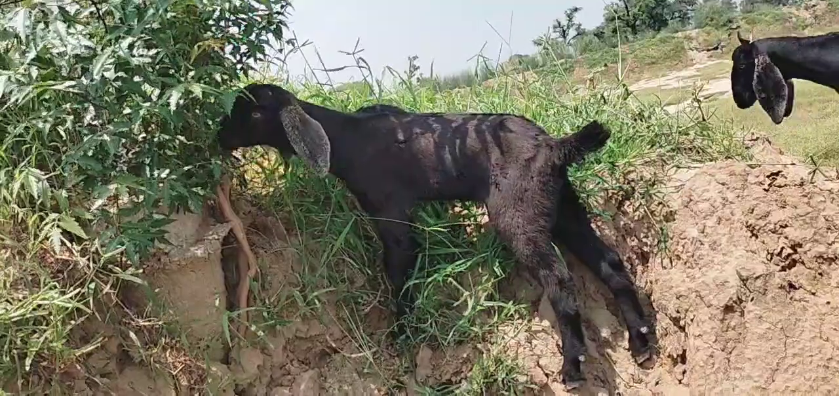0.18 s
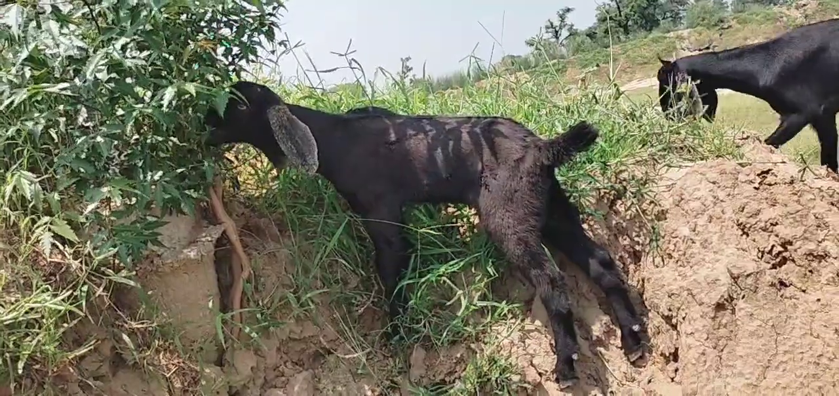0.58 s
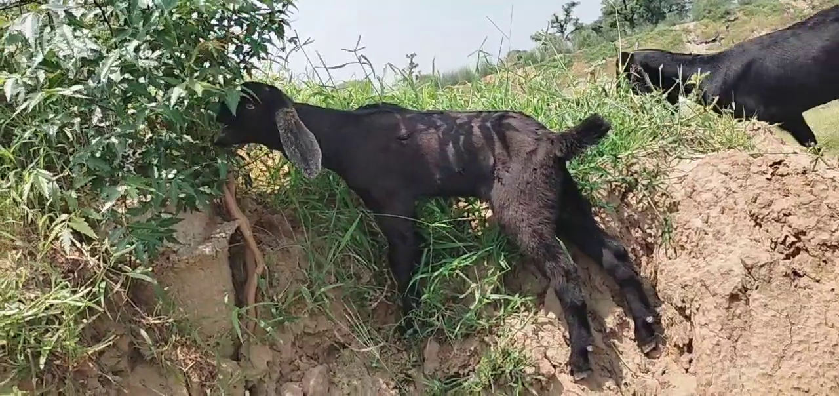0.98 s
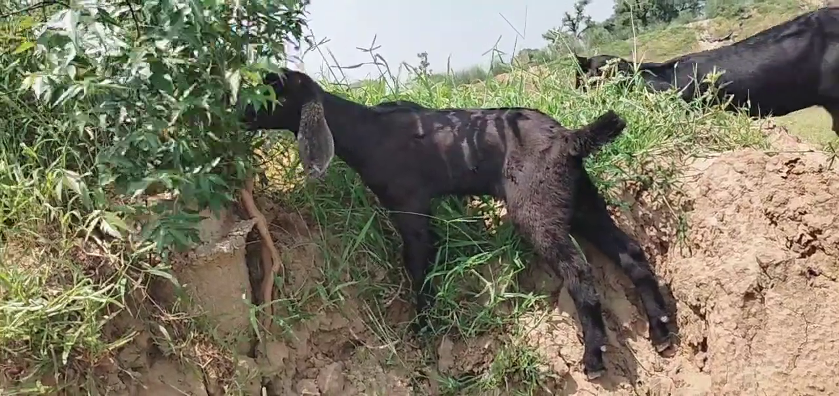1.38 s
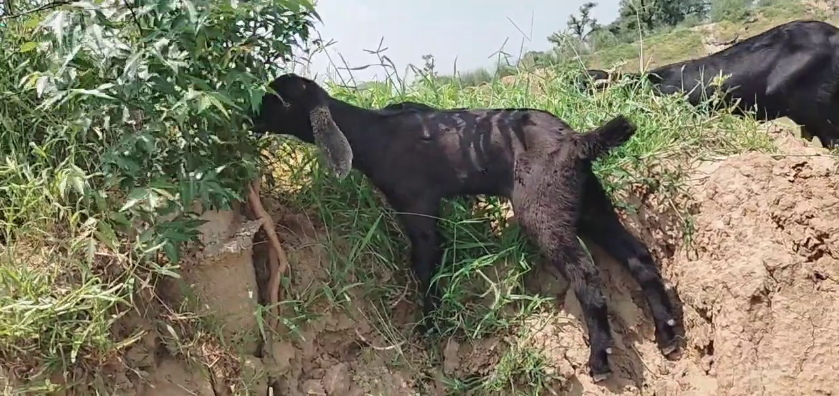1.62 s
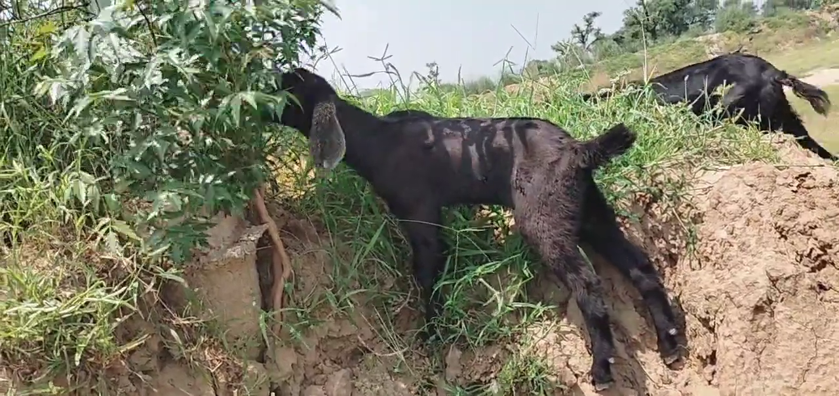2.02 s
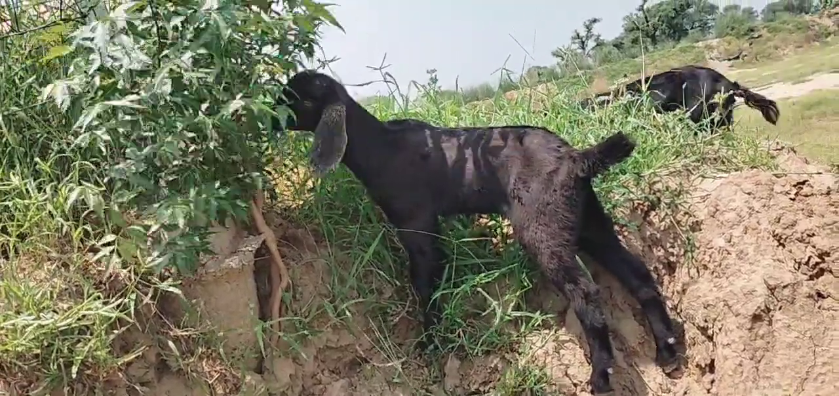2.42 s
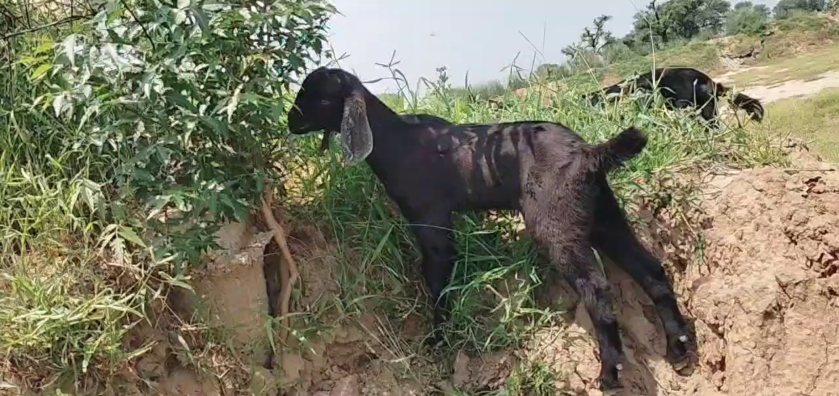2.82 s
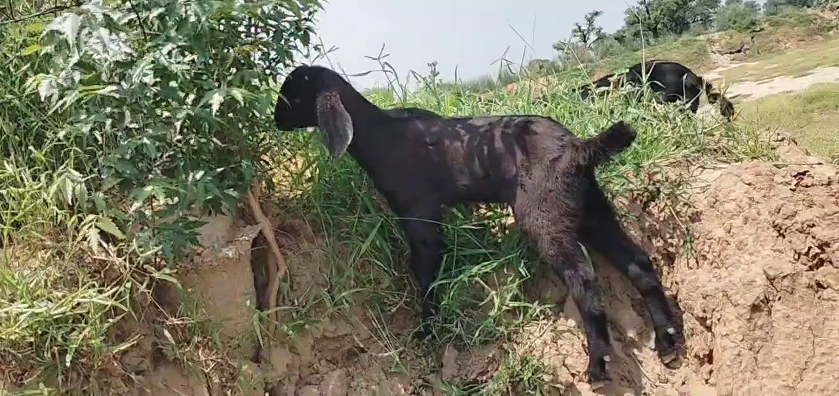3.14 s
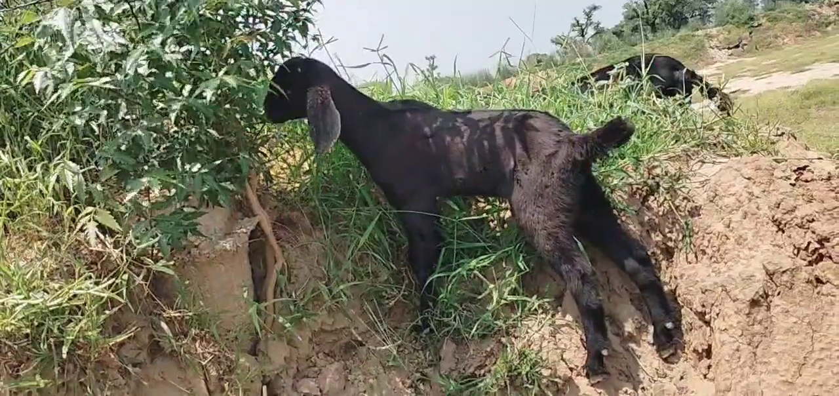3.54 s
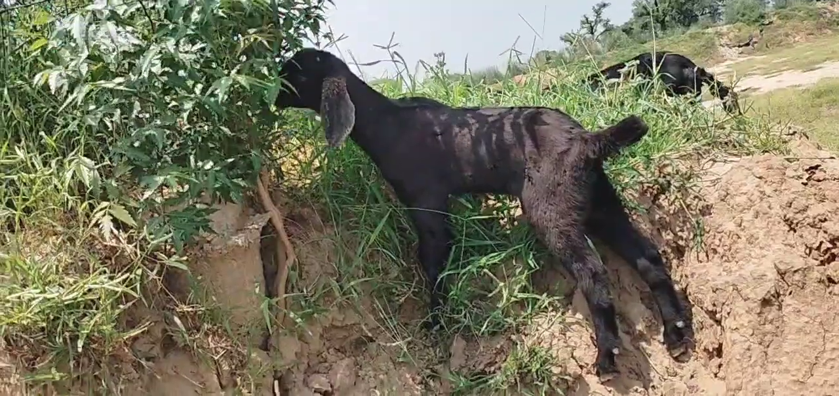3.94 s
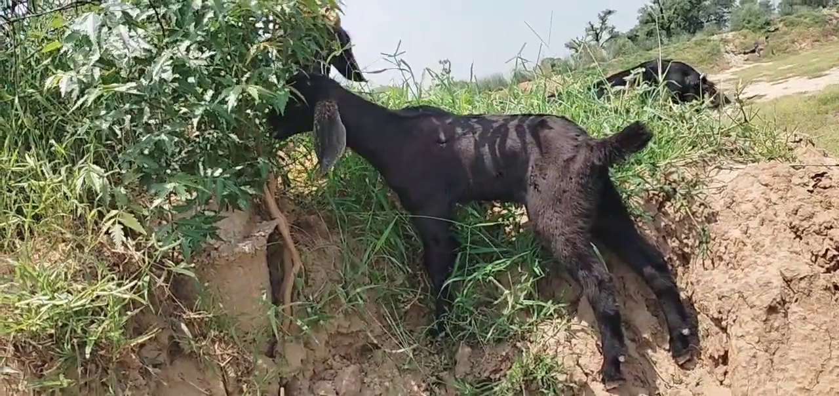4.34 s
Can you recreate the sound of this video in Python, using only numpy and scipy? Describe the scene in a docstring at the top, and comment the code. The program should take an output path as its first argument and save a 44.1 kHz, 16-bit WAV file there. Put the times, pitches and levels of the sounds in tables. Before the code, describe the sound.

Small birds chatter, peep and tick in an open, dry field with a quiet airy hush. Near the microphone, leaves brush and crackle as a goat feeds. One hard nasal snort bursts out early, far louder than the rest. Later come repeated falling whistles, stronger branch rustles, dull snaps, faint low puffs, and one weak snort around three seconds.

```python
"""Small birds chatter and tick while leaves rustle near by: a goat pushes its head through a leafy bush
on an open field bank, with twig snaps, soft low puffs, one hard snort and later a softer one.
Birds are gliding sines, the bush is clumped noise grains, twigs and puffs are short ringing bursts,
and the snorts are nostril flaps that knock a cavity and chop a hiss, over a quiet outdoor hush."""
import sys
import numpy as np
from scipy import signal
from scipy.fft import rfft, irfft
from scipy.io import wavfile

SR = 44100
rng = np.random.default_rng(int(sys.argv[2]) if len(sys.argv) > 2 else 0)


def ratio_of_db(decibels):
    """Turn decibels (scalar or array-like) into linear amplitude factors; 0 dB maps to 1."""
    return 10 ** (np.asarray(decibels, float) / 20)


def wav_out(sig):
    """Save sig, one row per channel (or a flat mono array), as 16-bit PCM at SR to the path in sys.argv[1]."""
    wavfile.write(sys.argv[1], SR, np.round(np.clip(np.atleast_2d(sig).T, -1, 1) * 32767).astype(np.int16))


N = 197656   # length in samples


def seconds(length_s):
    """Time in seconds at every sample of a short sound."""
    return np.arange(round(length_s * SR)) / SR


def rms_one(x):
    """Scale to rms 1."""
    return x / np.sqrt(np.mean(x ** 2) + 1e-20)


def coloured(x, spectrum):
    """Give a flat sound the spectrum (Hz, dB per Hz), then scale to rms 1."""
    hz, db = np.transpose(spectrum)
    bins = np.arange(N // 2 + 1) * SR / N + 1
    gain = ratio_of_db(np.interp(np.log(bins), np.log(hz), db))
    return rms_one(irfft(rfft(x) * gain, N))


def band(x, low_hz, high_hz):
    """Butterworth band-pass."""
    return signal.sosfilt(signal.butter(2, [low_hz, high_hz], "band", fs=SR, output="sos"), x)


def resonate(x, hz, width_hz):
    """Two-pole resonance with gain 1 on top."""
    r = np.exp(-np.pi * width_hz / SR)
    feedback = [1, -2 * r * np.cos(2 * np.pi * hz / SR), r * r]
    return signal.lfilter([(1 - r * r) / 2, 0, (r * r - 1) / 2], feedback, x)


def drift(rate):
    """Slow random wander of rms 1; a higher rate (Hz) wanders faster."""
    r = np.exp(-2 * np.pi * rate / SR)
    smooth = signal.lfilter([1], [1, -2 * r, r * r], rng.standard_normal(N + SR))
    return rms_one(smooth[SR:])


def grains(per_s, spread_db, clump_db):
    """Random leaf contacts of uneven size that come in clumps; rms 1."""
    sizes = ratio_of_db(spread_db * np.minimum(rng.exponential(1, N), 4)) * rng.standard_normal(N)
    contacts = rng.random(N) < per_s / SR
    return rms_one(sizes * contacts * ratio_of_db(clump_db * drift(40.0)))


def add(out, start_s, sound):
    """Mix a short sound in at its start time."""
    i = round(start_s * SR)
    out[i:i + len(sound)] += sound[:N - i]


# Colour of the hush. Each row: pitch in Hz, relative level in dB per Hz.
HUSH_SPECTRUM = [(18, -44), (30, -8), (111, 6.5), (353, -3.5), (459, -2), (645, -2), (2100, -7.5),
                 (2800, -7.5), (4260, -6), (5990, -19), (8200, -34), (11200, -25), (15800, -19)]


def hush():
    """Quiet outdoor noise whose level wanders slowly."""
    level_db = -72.5 + 2.07 * drift(7.5)
    return ratio_of_db(level_db) * coloured(rng.standard_normal(N), HUSH_SPECTRUM)


NOTE_EDGE_S, CHATTER_WAVER_DB, FADE_DB_PER_S = .005, 3.5, 40.5


def whistle(rows, edge_s, waver_db, multiple=1):
    """A sine along rows (s, Hz, rms dB) with soft ends; strength and pitch waver at random."""
    s, hz, db = np.transpose(rows)
    t = np.arange(s[0], s[-1], 1 / SR)
    ends = np.clip(np.minimum(t - s[0], s[-1] - t) / edge_s, 0, 1)
    waver, wobble = [np.interp(t - s[0], np.arange(80) * .004, rng.standard_normal(80)) for _ in range(2)]
    pitch = np.interp(t, s, hz) * (1 + .005 * waver_db * wobble)
    turns = multiple * np.cumsum(pitch) / SR
    level = ratio_of_db(np.interp(t, s, db) + waver_db * waver)
    return np.sqrt(2) * ends * level * np.sin(2 * np.pi * turns)


# Shapes of a falling whistle and a rising peep.
# Each row: seconds from the start, pitch in Hz, level in dB added to that of the call.
FALL_SHAPE = [(0, 5657, -4), (.008, 4700, -2.5), (.02, 3900, 7), (.035, 3450, 4), (.06, 3150, 8),
              (.08, 2850, 4), (.092, 2640, 11)]
PEEP_SHAPE = [(0, 5910, -8), (.015, 6200, -3), (.03, 6500, 0), (.042, 6580, -6)]
# When they call. Each row: start in seconds, level in dB added to that of the shape.
FALL_CALLS = [(1.431, -84), (1.779, -79.5), (2.123, -79.5), (2.466, -78), (2.814, -71), (3.16, -69),
              (3.516, -73), (3.873, -73.5)]
PEEP_CALLS = [(.188, -80), (.468, -70.5), (1.772, -74), (2.05, -73.5), (2.325, -75), (2.6, -76),
              (2.868, -74), (3.42, -92)]


def repeated_calls():
    """Two birds each repeat one fixed glide of pitch."""
    out = np.zeros(N)
    for shape, calls in [(FALL_SHAPE, FALL_CALLS), (PEEP_SHAPE, PEEP_CALLS)]:
        for start, db in calls:
            add(out, start, ratio_of_db(db) * whistle(shape, NOTE_EDGE_S, waver_db=3.0))
    return out


# Shape of one tick. Each row: seconds from the start, share of the tick's top pitch,
# level in dB added to the call.
TICK_SHAPE = [(0, 0.76, 0.5), (.0009, 1, -3), (.0018, .84, -36), (.003, .6, -34)]
# The chip after two ticks. Each row: seconds from the first tick, pitch in Hz, level in dB added to the call.
CHIP_SHAPE = [(.022, 3100, -28), (.025, 3700, -18), (.028, 3300, -20), (.031, 4700, -14),
              (.0345, 4900, -15), (.036, 4900, -28)]
# Each row: start in seconds, level in dB added to the shapes, top pitch of the ticks in Hz.
TICK_CALLS = [(0.081, -54.5, 8100), (0.984, -52, 8400), (1.8343, -46.5, 8300), (2.7377, -42.5, 8400),
              (3.6315, -40, 8770), (4.4373, -41, 8750)]


def ticks():
    """A bird gives two very short ticks, the first one softer, and then a chip."""
    out = np.zeros(N)
    for start, db, top_hz in TICK_CALLS:
        tick = ratio_of_db(db) * whistle(np.multiply(TICK_SHAPE, [1, top_hz, 1]), edge_s=.0004, waver_db=3)
        add(out, start, tick * ratio_of_db(-2.5))
        add(out, start + .0122, tick)
        chip = ratio_of_db(db) * whistle(CHIP_SHAPE, edge_s=.001, waver_db=1)
        add(out, start + CHIP_SHAPE[0][0], chip)
    return out


# Gliding notes, and two faint glides at about three times the pitch of the rich calls, at 4.002 and 4.37 s.
# Each row: start in seconds, length in seconds, start pitch in Hz, end pitch in Hz, level in dB at the start.
GLIDES = [(.055, 0.082, 4790, 3860, -67.5), (.095, 0.086, 2050, 2150, -69.5),
          (.108, 0.026, 4850, 4400, -66), (.14, 0.025, 4350, 3940, -67), (.165, .02, 5300, 5030, -78),
          (.358, 0.076, 5000, 3800, -71), (.305, 0.016, 4700, 4780, -75.5), (.45, 0.014, 5300, 4860, -61),
          (.746, 0.034, 4540, 3600, -73), (.835, 0.031, 4000, 3350, -70), (.905, 0.03, 3400, 3470, -71.5),
          (.93, 0.0095, 3830, 5300, -72), (1.012, 0.044, 4470, 4880, -70.5),
          (1.025, 0.063, 3870, 3470, -70.5), (1.078, 0.03, 3270, 3800, -63.5),
          (1.69, 0.023, 4160, 4060, -79), (1.722, 0.029, 4130, 4500, -75), (1.752, .02, 5400, 4950, -83),
          (2.16, 0.023, 3820, 4340, -73), (3.265, 0.029, 3500, 3385, -66), (3.43, 0.04, 2150, 2310, -71.5),
          (3.454, 0.023, 2730, 2820, -67), (3.62, 0.052, 2780, 2220, -68),
          (3.675, 0.033, 3100, 3820, -67.5), (3.75, 0.099, 2050, 2170, -70.5),
          (3.995, 0.02, 1840, 1800, -61), (4.002, 0.033, 7800, 8250, -78), (4.118, 0.041, 1790, 1810, -65),
          (4.148, 0.052, 5380, 3840, -72), (4.236, 0.04, 5000, 4750, -73), (4.37, 0.11, 5560, 4950, -75)]
# Notes that go up and down again. Each row: start in seconds, length in seconds, edge pitch in Hz,
# top pitch in Hz, level in dB at the start.
ARCHED_NOTES = [(.408, 0.043, 3820, 5500, -65), (.418, 0.04, 3780, 4330, -63),
                (.488, 0.041, 3630, 4770, -64.5), (1.535, 0.051, 5480, 5860, -77),
                (1.652, 0.03, 3960, 5500, -81), (4.192, 0.029, 4100, 4230, -66.5)]


def chatter():
    """Short fading notes and two rich-call overtones: glides level out, arches return to their edge pitch."""
    out = np.zeros(N)
    along = np.linspace(0, 1, 12)
    glide = 1 - (1 - along) ** 3.7   # starts steep
    arch = np.abs(np.sin(np.pi * along)) ** 0.74   # a smaller power flattens the top
    for notes, shape in [(GLIDES, glide), (ARCHED_NOTES, arch)]:
        for start, length, from_hz, to_hz, db in notes:
            hz = from_hz + (to_hz - from_hz) * shape
            rows = np.transpose([length * along, hz, db - FADE_DB_PER_S * length * along])
            add(out, start, whistle(rows, NOTE_EDGE_S, CHATTER_WAVER_DB))
    return out


# Each row: level in dB at the start, level in dB of the overtone against it before the throat filter,
# then the path of the pitch as pairs of time in seconds and pitch in Hz.
RICH_NOTES = [(-59.5, 2.5, [(3.995, 2490), (4.01, 2710), (4.043, 2930), (4.058, 2680)]),
              (-68, -9, [(4.06, 2924), (4.15, 2840)]), (-57.5, -4, [(4.218, 5300), (4.23, 4100),
              (4.25, 3400), (4.275, 2942), (4.305, 2428), (4.345, 2206), (4.385, 1900), (4.44, 1519)])]


def rich_calls():
    """A bird whistles with a strong overtone at twice the pitch, filtered by its throat."""
    out = np.zeros(N)
    for db, overtone_db, path in RICH_NOTES:
        start = path[0][0]
        rows = [(s, hz, db - FADE_DB_PER_S * (s - start)) for s, hz in path]
        overtone = whistle(rows, 0.0079, 2.4, multiple=2)
        overtone = band(band(overtone, 2300, 5000), 2000, 4800)   # the throat favours the middle
        add(out, start, whistle(rows, 0.01, 2.6) + ratio_of_db(overtone_db) * overtone)
    return out


# Each row: start in seconds, end in seconds, start pitch in Hz, later pitch in Hz,
# start level in dB before the weights of the overtones.
BUZZY_NOTES = [(0.783, 0.908, 1366, 1424, -61.5), (3.156, 3.292, 1400, 1432, -58.5)]
# Each row: multiple of the pitch, weight in dB.
BUZZY_OVERTONES = [(1, -7), (2, -0.5), (4, -18), (5, -18)]


def buzzes():
    """A bird's note with overtones flutters quickly in strength, which sounds as a buzz."""
    out = np.zeros(N)
    per_s, depth = 103, 0.44
    for start, end, start_hz, end_hz, db in BUZZY_NOTES:
        rows = [(start, start_hz, db), (start + 0.0344, end_hz, db - 3.0), (end, end_hz, db - 9.0)]
        note = sum(ratio_of_db(part_db) * whistle(rows, 0.015, waver_db=6.0, multiple=k)
                   for k, part_db in BUZZY_OVERTONES)
        flutter = 1 + depth * np.sin(2 * np.pi * per_s * np.arange(len(note)) / SR)
        add(out, start, note * flutter)
    return out


def birds():
    """All the bird voices together."""
    return repeated_calls() + ticks() + chatter() + rich_calls() + buzzes()


# Tugs at the branch. Each row: peak time in seconds, rise in seconds, fall in seconds,
# peak rustle in dB, peak crackle in dB. Rise and fall span 28 dB; the crackle shortens the fall.
BRANCH_TUGS = [(0.0, .01, 0.15, -70.5, -80), (0.095, 0.092, 0.29, -65.5, -72.5),
               (0.3, .004, 0.021, -61, -77), (0.405, 0.0065, 0.1, -56.5, -59),
               (0.54, 0.6, 0.16, -70.5, -79), (0.838, 0.23, 0.4, -66, -77), (1.023, .12, 0.16, -67, -75),
               (1.282, 0.75, 0.27, -67, -74.5), (1.442, 0.09, 0.2, -68, -80), (1.542, 0.083, .11, -58, -71),
               (1.881, 0.17, .13, -62.5, -75.5), (2.01, 0.086, 0.44, -61.5, -68),
               (2.11, 0.58, 0.04, -64.5, -87), (2.213, 0.088, 0.4, -60.5, -76),
               (2.399, 0.012, 0.13, -52, -76), (2.509, 0.02, 0.082, -62.5, -85),
               (2.574, 0.029, 0.016, -49, -90), (2.6, 0.053, 0.35, -58.5, -96), (2.73, 0.18, 1, -58, -65.5),
               (2.9, 0.71, 0.6, -75, -72), (3.051, 0.023, 0.39, -49, -64.5), (3.15, 0.3, 0.32, -55, -75),
               (3.42, 0.12, 0.44, -80, -89), (3.559, 0.16, 0.13, -65.5, -78),
               (3.647, 0.045, 0.31, -59.5, -71), (3.81, 0.59, 0.11, -65, -92),
               (3.995, 0.17, 0.26, -61, -84), (4.131, 0.077, 0.08, -56, -75), (4.26, 0.085, 0.04, -67, -79),
               (4.32, 0.22, 0.95, -62.5, -74)]


def tugging():
    """Every tug swells and dies away, overlaps add in power; gives the gains of rustle and crackle."""
    span_db, crackle_fall_share, still_crackle_db = 28, 0.54, -94.5
    t = np.arange(0, N + 32, 32) / SR
    peak, rise, fall, rustle_db, crackle_db = np.transpose(BRANCH_TUGS)[:, :, None]
    before = np.maximum(peak - t, 0) / rise
    after = np.maximum(t - peak, 0) / fall
    rustle = ratio_of_db(rustle_db - span_db * (before + after)) ** 2
    # the crackle dies sooner than the rustle
    crackle = ratio_of_db(crackle_db - span_db * (before + after / crackle_fall_share)) ** 2
    powers = rustle.sum(axis=0), crackle.sum(axis=0) + ratio_of_db(still_crackle_db) ** 2
    return [np.interp(np.arange(N) / SR, t, np.sqrt(power)) for power in powers]


# Colour of the rubbing. Each row: pitch in Hz, relative level in dB per Hz.
BRANCH_SPECTRUM = [(180, -10), (300, -6), (778, -4.5), (1330, -3), (1680, 0.5), (1990, -0.5), (6500, -23.5),
                   (8450, -123), (14300, -120)]
# Woody resonances. Each row: pitch in Hz, width in Hz, strength in dB relative to the other rows.
WOOD_MODES = [(1330, 147, 3.5), (1790, 110, -26), (2150, 177, -5.5), (888, 49, -0.5), (490, 70, -9)]


def woody_rub():
    """Dragging branches: many small contacts excite wood resonances whose strengths wander; rms 1."""
    rub = coloured(grains(5500, spread_db=-1.0, clump_db=2.37), BRANCH_SPECTRUM)
    ring = sum(ratio_of_db(db + 1.6 * drift(5.7)) * resonate(rub, hz, width) for hz, width, db in WOOD_MODES)
    return rms_one(rub + 0.53 * ring)


# Relative strength in dB of five bands of the crackle, from low to high.
CRACKLE_BANDS = [8.5, -26, 6, -5, 3.5]


def leaf_crackle():
    """Dry leaf contacts in bands that wander separately, so the crackle is patchy in pitch; rms 1."""
    dry_leaves = grains(6000, spread_db=2.0, clump_db=-1.5)
    edges = np.geomspace(4200, 17000, 6)
    crackle = np.zeros(N)
    for k, db in enumerate(CRACKLE_BANDS):
        part = band(dry_leaves, edges[k], edges[k + 1])
        crackle += (-1) ** k * ratio_of_db(db + 2.9 * drift(17)) * part
    return rms_one(crackle)


# Swells of a soft high hiss. Each row: time in seconds, level in dB before a cut of 6 dB.
HISS_SWELLS = [(0.0, -84), (0.11, -75.5), (0.364, -84), (0.424, -72), (0.738, -90), (0.833, -73.5),
               (1.008, -71.5), (1.746, -82.5), (2.02, -76.5), (2.519, -77), (2.754, -69.5), (3.008, -71.5),
               (3.083, -65.5), (3.886, -79), (4.41, -75), (4.48, -85)]


def leaf_hiss():
    """High narrow noise from the leaves that swells and fades."""
    s, db = np.transpose(HISS_SWELLS)
    level_db = np.interp(np.arange(N) / SR, s, db) - 6.0
    return ratio_of_db(level_db) * rms_one(band(rng.standard_normal(N), 7200, 9400))


def bush():
    """Tugs drag branches with a woody ring, while leaves crackle and hiss above."""
    rustle_gain, crackle_gain = tugging()
    return rustle_gain * woody_rub() + crackle_gain * leaf_crackle() + leaf_hiss()


# Each row: start in seconds, peak of the ring in dB, pitch in Hz,
# crack strength in dB before a fixed scaling by 0.19.
TWIG_SNAPS = [(0.298, -57, 2190, -22), (0.404, -50.5, 885, 7), (0.46, -53.5, 1730, -20),
              (0.552, -53.5, 1534, -29), (1.436, -59, 860, 2), (1.455, -58.5, 870, 15),
              (1.515, -49, 1390, -29), (2.002, -48.5, 1710, 1), (2.216, -47.5, 1520, -12),
              (2.283, -56.5, 1310, 15.5), (2.396, -44.5, 1200, -48), (2.565, -52, 1340, -41),
              (2.589, -44, 1590, -23), (2.638, -48, 2200, 7.5), (3.051, -41, 1330, -16),
              (3.784, -54.5, 1450, -27), (4.09, -54.5, 1250, -22), (4.262, -57, 1060, 10)]


def snaps():
    """A splintering burst rings the twig for a few cycles and spits a short bright crack."""
    out, t = np.zeros(N), seconds(.06)
    for start, db, hz, treble_db in TWIG_SNAPS:
        splinter = rng.standard_normal((2, len(t)))
        burst = splinter[0] * (np.exp(-t / .0035) + .15 * np.exp(-t / .02))
        twig = resonate(burst, hz, .3 * hz)
        crack = band(splinter[1], 2000, 11000) * np.exp(-t / 0.004)
        add(out, start, ratio_of_db(db) * (twig / np.abs(twig).max() + 0.19 * ratio_of_db(treble_db) * crack))
    return out


# Each row: start in seconds, level in dB before the swell shapes it, pitch in Hz.
LOW_PUFFS = [(0.09, -59, 271), (0.142, -59, 236), (0.637, -58, 232), (0.698, -67, 243), (0.734, -61.5, 240),
             (0.783, -67.5, 206), (0.853, -67, 350), (1.022, -63, 220), (1.063, -59.5, 252),
             (1.278, -57.5, 292), (1.282, -54, 245), (1.307, -59.5, 310), (1.537, -52, 177),
             (2.265, -63.5, 234), (2.299, -63, 253), (2.395, -55.5, 436), (2.598, -61, 266),
             (2.766, -57, 253), (2.986, -51, 250), (3.253, -61.5, 260), (3.387, -63, 293),
             (3.537, -64, 280), (3.645, -65, 240), (3.697, -62, 257), (3.996, -64, 242), (4.089, -60, 218)]


def puffs():
    """Each puff is a soft push that rings low for two or three cycles."""
    out, t = np.zeros(N), seconds(.08)
    swell = t / 0.0026 * np.exp(1 - t / 0.0033)
    for start, db, hz in LOW_PUFFS:
        add(out, start, -ratio_of_db(db) * swell * np.sin(2 * np.pi * hz * t))
    return out


def blow_db(t, db, attack_s, onset_db, length_s, release_db_per_s):
    """Level of a blow: it opens onset_db off its peak, rises, sags slowly and is released steeply."""
    rise = onset_db * np.maximum(1 - t / attack_s, 0) ** 2
    sag = 109.5 * np.maximum(t - attack_s, 0)   # dB
    release = release_db_per_s * np.maximum(t - length_s, 0)
    return db + rise - sag - release


# Colour of the air jet. Each row: pitch in Hz, relative level in dB per Hz.
JET_SPECTRUM = [(260, -55), (450, -22), (560, -9.5), (900, -0.5), (2000, -8), (2600, -10), (4080, 0.5),
                (5500, -14.5), (8500, -5.5), (11000, -20), (15800, -19)]
# Nose resonances. Each row: pitch in Hz, width in Hz, strength in dB relative to the other rows.
NOSE_MODES = [(1280, 300, -5.5), (2050, 350, 5.5), (2940, 210, -3.5), (4030, 250, -14), (4950, 450, -3.5)]


def air_jet():
    """Hiss of air rushing through the resonances of the nose; rms 1."""
    jet = coloured(rng.standard_normal(N), JET_SPECTRUM)
    ring = sum(ratio_of_db(db) * resonate(jet, hz, width) for hz, width, db in NOSE_MODES)
    return rms_one(jet + 3.8 * ring)


# Each row: start in seconds, seconds until the steep release, peak level of the air jet in dB before
# the chopping, peak level of the flaps in dB before the cavity, flaps per second at full blow.
SNORT_BLOWS = [(1.105, 0.09, -30.5, -30.5, 101), (3.027, .1, -73, -45.5, 57)]


def snorts():
    """The nostrils flap in the air jet: each flap knocks the nasal cavity and chops the hiss."""
    out, t = np.zeros(N), seconds(.25)
    jet = air_jet()
    for start, length_s, jet_db, flap_db, per_s in SNORT_BLOWS:
        flap = blow_db(t, flap_db, .036, -24, length_s, 332)
        slowing = np.maximum(1 + .026 * (flap - flap_db), .35)   # a weaker blow flaps more slowly
        cycle = np.cumsum(per_s * slowing) / SR % 1
        knocks = -np.exp(-cycle / 0.043) * ratio_of_db(flap)
        cavity = band(12 * resonate(knocks, 279.5, 89) + 4 * resonate(knocks, 132, 55), 43, 362)
        chop = 1 + .3 * np.cos(2 * np.pi * (cycle - .15))
        jet_level = ratio_of_db(blow_db(t, jet_db, .021, -11, length_s, 1000))
        i = round(start * SR)
        add(out, start, cavity + chop * jet_level * jet[i:i + len(t)])
    return out


def field(x):
    """Leaves and the earth bank scatter a short, dull, diffuse tail."""
    t = seconds(.2)
    decay = ratio_of_db(-60 * t / .11) * (t > .002)   # 60 dB in 0.11 s, after a 2 ms gap
    tail = band(rng.standard_normal(len(t)), 600, 8500) * decay
    return ratio_of_db(-13.5) * signal.fftconvolve(x, tail / np.linalg.norm(tail))[:N]


def scene():
    """Birds, snaps, puffs and snorts with their echoes, then the bush and the hush."""
    echoing = birds() + snaps() + puffs() + snorts()
    return (echoing + field(echoing) + bush() + hush())[None]


def top_cut(x):
    """Nothing passes above the cut-off."""
    return signal.sosfilt(signal.butter(12, 15900, fs=SR, output="sos"), x)


def record(dry):
    """The microphone drops the deep bass below 65 Hz."""
    mix = signal.sosfilt(signal.butter(3, 65, "high", fs=SR, output="sos"), dry)
    return top_cut(mix)


dry = scene()
out = record(dry)
wav_out(out)
```